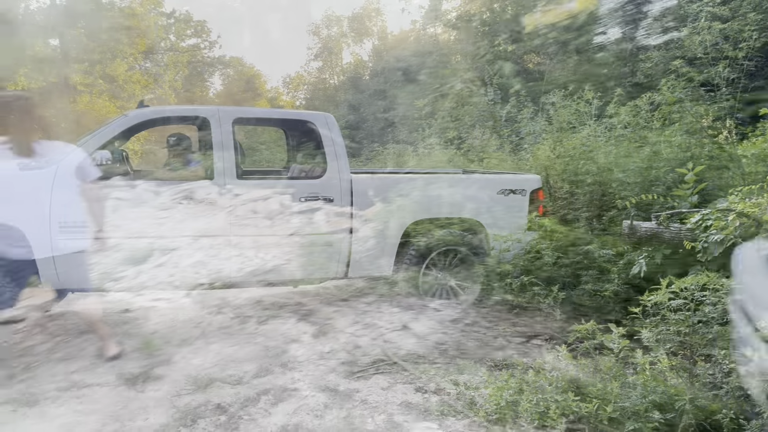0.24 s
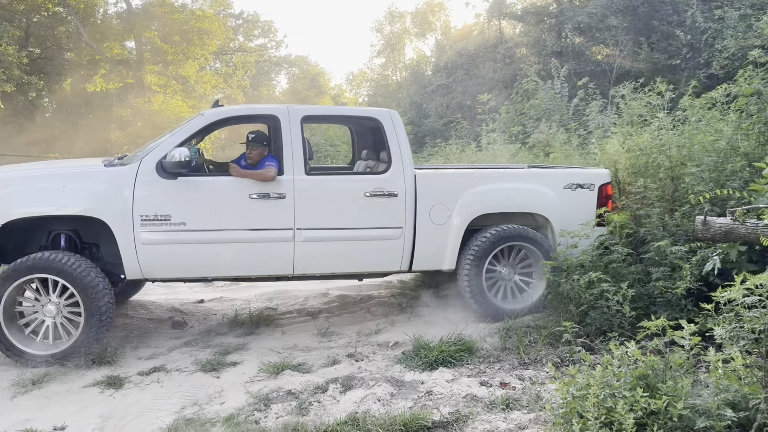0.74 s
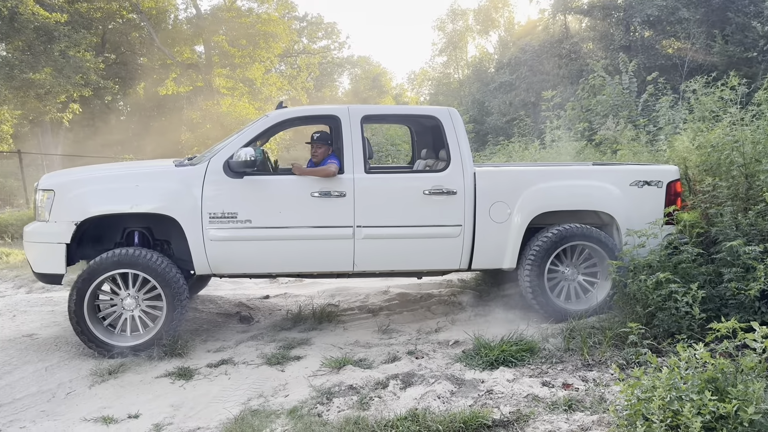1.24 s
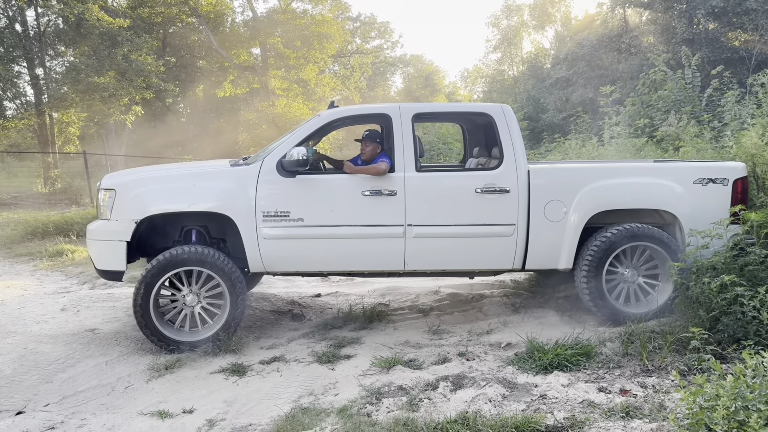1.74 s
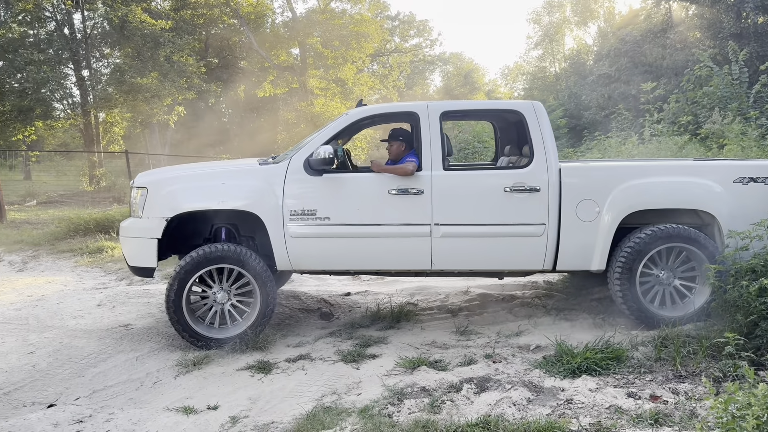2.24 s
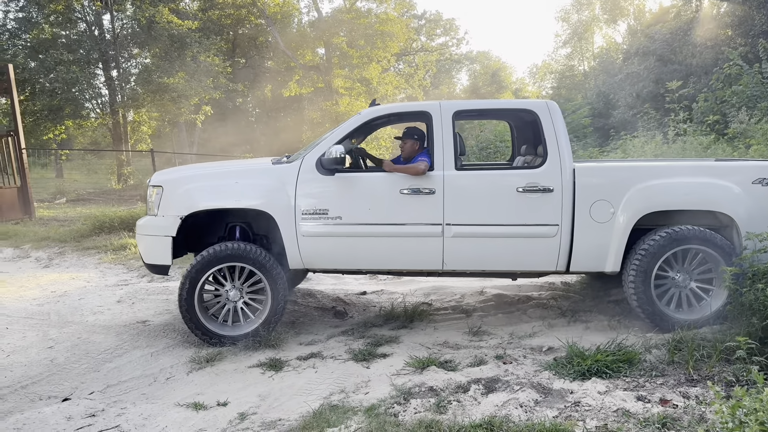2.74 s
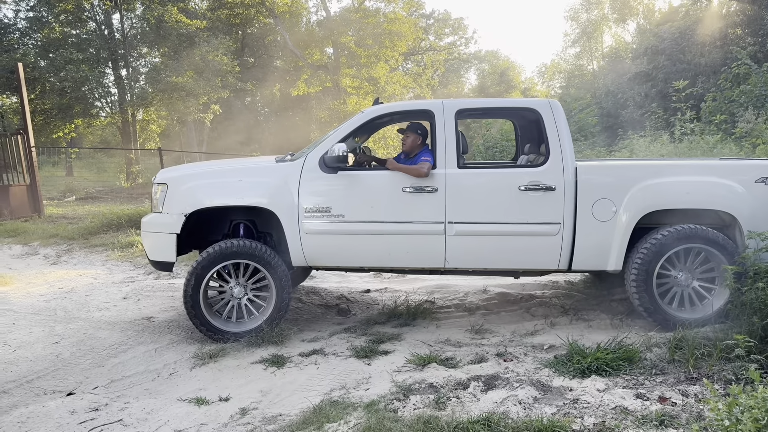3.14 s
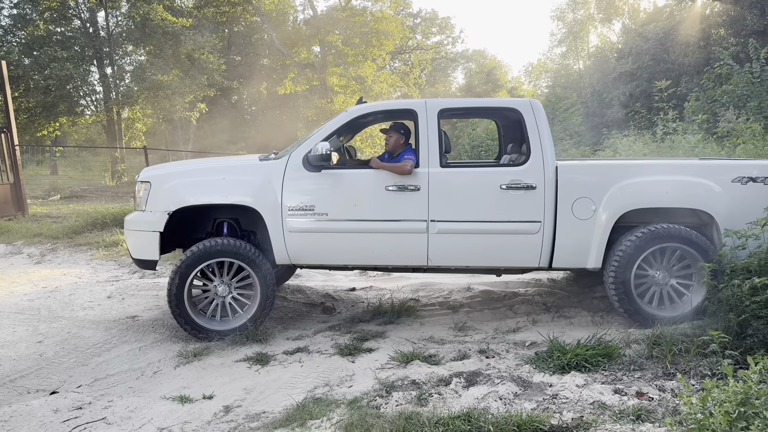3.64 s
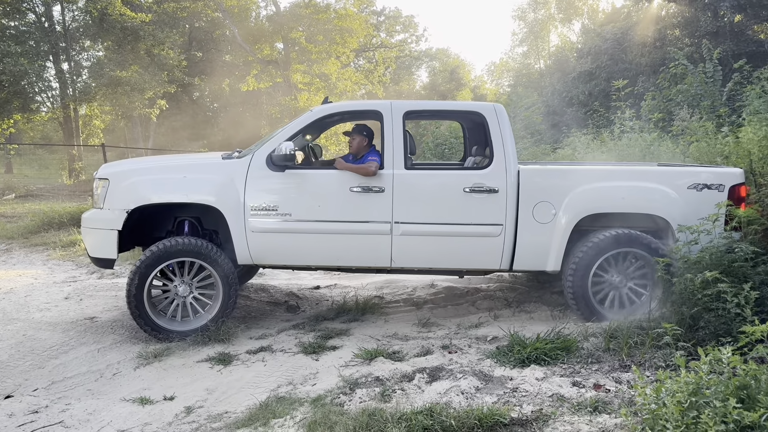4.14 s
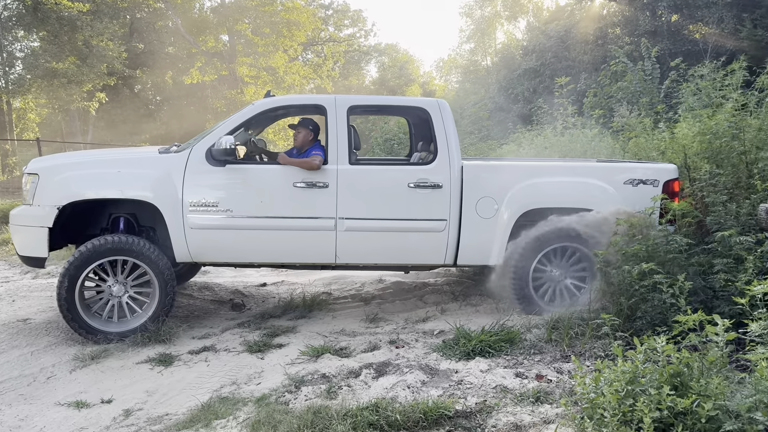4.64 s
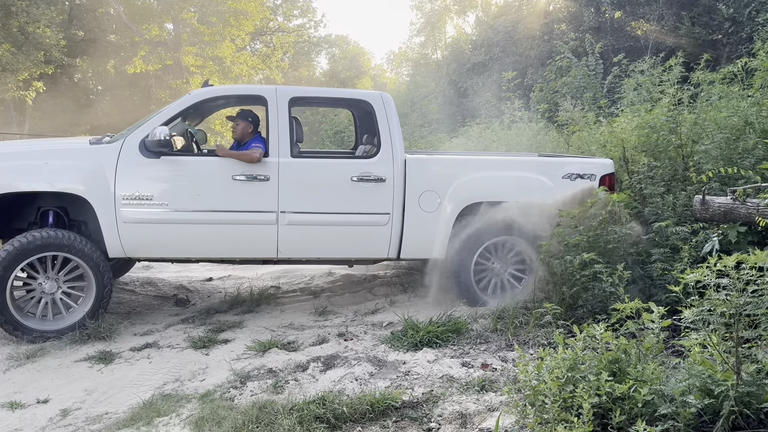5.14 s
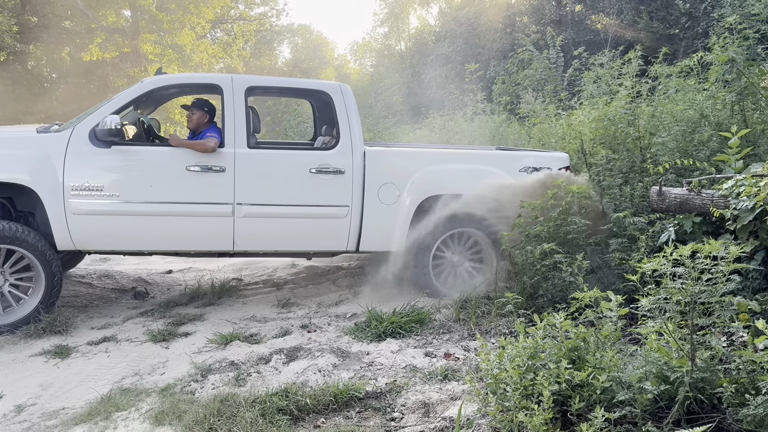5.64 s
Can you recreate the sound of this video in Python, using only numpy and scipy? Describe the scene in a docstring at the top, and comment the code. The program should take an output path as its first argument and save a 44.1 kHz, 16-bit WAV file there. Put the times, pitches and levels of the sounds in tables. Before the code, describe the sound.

Outdoors beside bushes, quiet uneven idle throbs under a cricket trill and katydid buzz, with a small knock and faint ticks. After a gentle swell and dip, the engine suddenly pulls hard: intake whoosh, deep boom merging into rising tones, rough gas rasp and crackles. The loud roar holds and cuts off. Small stereo device close by, with a slight hollow colour from the sand.

```python
"""On sand beside bushes, a V8 pickup a few metres off lopes at idle, swells a little, then pulls hard.
A wheel spins and the intake howls, a narrow band of noise. Uneven firing impulses ring the exhaust and merge
into tones at high revs; gas rasps from the tailpipe as gated noise and bounces off the ground.
Insects trill in the bushes as pulsed tones and noise; something on the truck clinks now and then.
Two microphone ports hear it all with different phase."""
import sys
import numpy as np
from scipy import signal
from scipy.fft import rfft, irfft, next_fast_len
from scipy.io import wavfile
from scipy.ndimage import uniform_filter1d, map_coordinates

SR = 44100
rng = np.random.default_rng(int(sys.argv[2]) if len(sys.argv) > 2 else 0)


def wav_record(signal):
    """Record a signal, one row per channel, as 16-bit PCM in the file named by sys.argv[1]."""
    frames = np.transpose(np.atleast_2d(signal))
    bounded = np.clip(frames, -1, 1)
    # unit amplitude maps onto the largest positive 16-bit level
    quanta = np.round(bounded * 32767).astype(np.int16)
    wavfile.write(sys.argv[1], SR, quanta)


N = 259308  # samples


def amp(db):
    """Decibels to amplitude."""
    return 10 ** (np.asarray(db) / 20)


def unit(x):
    """Scale to rms 1."""
    return x / np.sqrt(np.mean(x ** 2) + 1e-20)


def along(points, hz):
    """Interpolate (Hz, value) points on a log frequency axis."""
    f, v = np.transpose(points)
    return np.interp(np.log(hz + 1), np.log(f + 1), v)


def curves(rows):
    """One value per sample for each column after the time."""
    s, *cols = np.transpose(rows)
    return [np.interp(np.arange(N) / SR, s, c) for c in cols]


def wobble(rate):
    """A smooth random curve with rate knots a second."""
    knots = rng.standard_normal(int(N * rate / SR) + 4)
    return map_coordinates(knots, [np.arange(N) * rate / SR])


def filtered(x, response):
    """Multiply the spectrum of x by a complex response of frequency."""
    m = next_fast_len(N + SR)
    return irfft(rfft(x, m) * response(np.fft.rfftfreq(m, 1 / SR)), m)[..., :N]


def causal(points):
    """Minimum-phase response with the gain of (Hz, dB) points, by folding the cepstrum."""
    def response(hz):
        cepstrum = irfft(np.log(amp(along(points, hz)) + 1e-6))
        half = len(cepstrum) // 2
        cepstrum[1:half] *= 2
        cepstrum[half + 1:] = 0
        return np.exp(rfft(cepstrum))
    return response


def mode(hz_centre, hz_width):
    """One resonance with peak gain 1."""
    return lambda f: 1j * f * hz_width / (hz_centre ** 2 - f * f + 1j * f * hz_width)


def rush(spectrum, alike, gate=1):
    """Stereo noise of rms 1, partly shared between left and right, gated before it is coloured."""
    def colour(hz):
        turn = np.arccos(np.clip(along(alike, hz), -1, 1)) / 2
        return amp(along(spectrum, hz)) * [np.cos(turn), np.sin(turn)]
    mid, side = filtered(gate * rng.standard_normal((2, N)), colour)
    return unit(np.array([mid + side, mid - side]))


def steady(x, span_s):
    """Divide x by its own running rms."""
    power = uniform_filter1d(x ** 2, int(span_s * SR), mode="reflect")
    return x / np.sqrt(abs(power) + 1e-20)


def add(out, s, sound):
    """Mix a short sound in at a time in seconds."""
    out[:, round(s * SR):][:, :sound.shape[-1]] += sound


# Colour of leaves and far insects: freq_hz [Hz], relative level_db [dB per Hz]
AIR_COLOUR = [(1000, 9), (2500, 2), (6840, -8), (8040, -6), (9380, -9), (10800, -9), (12600, -13.5),
              (13800, -36), (15700, -15)]
# High hiss, which swells with the pull: start_s [s], level_db [dB]
AIR_LEVEL = [(0, -54), (.4, -57), (2.4, -52.5), (3.0, -55.5), (3.28, -52.5), (3.48, -39), (4.3, -49.5),
             (5.0, -50), (5.88, -45)]


def bush_air():
    """Leaves and far insects make a wide hiss: coloured noise whose level wavers."""
    level = amp(curves(AIR_LEVEL)[0] + 1.96 * wobble(11.0))
    return level * rush(AIR_COLOUR, [(3000, 0.093), (12000, 0.78)])


# Cricket trill: start_s [s], level_db [dB]
CRICKET = [(0, -75), (.5, -70), (1.3, -66), (2.7, -58), (3.4, -60), (3.7, -72), (5.88, -76)]
# Katydid buzz: start_s [s], level_db [dB]
KATYDID = [(.95, -65), (1.15, -69), (2.5, -58.5), (2.92, -60.5), (2.96, -96), (3.2, -76), (3.45, -58.5),
           (4.3, -72), (5.88, -73)]
TICK_START_S, TICK_GAP_S, TICK_COUNT = .247, .0795, 10  # katydid's slow strokes
TICK_DB, TICK_SWELL_DB = -62, 0.7  # first stroke, gain a stroke


def insects():
    """A cricket trills 69 tone pulses a second; a katydid's wing noise buzzes at 34, with slow ticks early on."""
    t = np.arange(N) / SR
    pulse = np.maximum(np.cos(2 * np.pi * 69.03 * t + 1.3), 0) ** 1.5 + .2
    tone = np.sin(2 * np.pi * 10800 * t + 1.5 * wobble(300))
    tone = tone + .4 * np.sin(2 * np.pi * 10600 * t + 1.5 * wobble(300))
    trill = unit(filtered(pulse * tone, lambda f: mode(10750, 900)(f) ** 2))
    cricket = amp(curves(CRICKET)[0]) * trill

    wing_colour = [(12500, -38.0), (13100, 5.5), (14300, 11), (15100, 9.0), (15400, -22.0)]
    wing = rush(wing_colour, [(14000, 0.65)])
    buzz = unit(1.2 + (1 + np.cos(2 * np.pi * 34.3 * t + .4 * wobble(1.8))) ** 2 / 3)
    strokes = 0
    for k in range(TICK_COUNT):
        after = t - (TICK_START_S + k * TICK_GAP_S)
        level_db = TICK_DB + k * TICK_SWELL_DB
        strokes = strokes + amp(level_db - 60 * np.maximum(after, 0) / 0.033) * (after > 0)
    katydid = wing * (amp(curves(KATYDID)[0]) * buzz + strokes)
    return cricket * amp([[.3], [-.3]]) + katydid


# Knocks on the truck: start_s [s], level_db before the mode and clack gains [dB], t60_s [s]
CLINKS = [(0.478, -73, 0.036), (0.5076, -59, 0.037), (0.5182, -54.5, 0.15)]
# Ring of a knock: pitch_hz [Hz], relative level_db [dB]
CLINK_MODES = [(1385, 13), (2100, 4), (3180, -2)]
CLINK_PAN_DB, CLACK_DB = 4.5, 10  # left over right; gain of the dry clack
# Faint bright ticks: start_s [s], level_db before the filter [dB], pan_db left over right [dB]
TAPS = [(0.6774, -48, 8), (1.5209, -45, 6), (1.6496, -47.5, -5), (2.4584, -50, 0.5), (2.6544, -49, -2)]
TAP_HZ, TAP_WIDTH_HZ, TAP_T60_S = 5000, 2300, 0.037


def clinks():
    """Small knocks, three short modes with a dry noise clack, and faint bright ticks of decaying noise."""
    knocks, taps = np.zeros((2, N + SR)), np.zeros((2, N + SR))
    t = np.arange(SR // 5) / SR
    for s, db, t60 in CLINKS:
        ring = sum(amp(level_db) * np.sin(2 * np.pi * hz * t) for hz, level_db in CLINK_MODES)
        clack = amp(CLACK_DB) * signal.lfilter([.5], [1, -.5], rng.standard_normal(len(t)))
        pan = amp([[CLINK_PAN_DB / 2], [-CLINK_PAN_DB / 2]])
        add(knocks, s, amp(db - 60 * t / t60) * (ring + clack) * pan)
    for s, db, pan_db in TAPS:
        tap = amp(db - 60 * t / TAP_T60_S) * rng.standard_normal(len(t))
        add(taps, s, tap * amp([[pan_db / 2], [-pan_db / 2]]))
    return knocks[:, :N] + filtered(taps[:, :N], mode(TAP_HZ, TAP_WIDTH_HZ))


# Tailpipe cracks: start_s [s], body level_db and treble edge level_db, both before filtering [dB]
CRACKS = [(3.441, -22, -51.5), (3.745, -31, -59.5), (3.83, -14, -62), (3.902, -22, -70),
          (4.126, -22, -67.5), (5.621, -42, -63), (5.678, -18.5, -65), (5.734, -11.5, -51),
          (5.79, -16.5, -56.5), (5.844, -20, -51)]
CRACK_T60_S, POP_HZ, POP_WIDTH_HZ = .016, 1780, 2200


def cracks():
    """Sharp pops of gas at the tailpipe, a few milliseconds of noise: a dull body and a bright edge."""
    body, edge = np.zeros((2, N + SR)), np.zeros((2, N + SR))
    t = np.arange(SR // 20) / SR
    for s, db, treble_db in CRACKS:
        burst = rng.standard_normal(len(t)) * amp(-60 * t / CRACK_T60_S)
        add(body, s, amp(db) * burst)
        add(edge, s, amp(treble_db) * burst)
    dull = filtered(body[:, :N], lambda f: mode(POP_HZ, POP_WIDTH_HZ)(f) ** 2)
    bright = filtered(edge[:, :N], lambda f: mode(8000, 9000)(f) ** 2)
    return dull + bright


HOWL_HZ, HOWL_WIDTH_HZ = 2450, 170
HOWL_DB, HOWL_S = -41, 3.463  # level before wavering and shaping; moment of its peak shape
HOWL_RISE_S, HOWL_FADE_S = .045, .3  # exponential time constants


def howl():
    """The intake howls as the throttle opens: a narrow rush of air that swells fast and fades slowly."""
    after = np.arange(N) / SR - HOWL_S
    rise = np.exp(np.minimum(after, 0) / HOWL_RISE_S)
    fade = np.exp(-np.maximum(after, 0) / HOWL_FADE_S)
    shape = np.where(after < 0, rise, fade)
    air = filtered(rng.standard_normal(N), lambda f: mode(HOWL_HZ, HOWL_WIDTH_HZ)(f) ** 2)
    return amp(HOWL_DB + 4.8 * wobble(12)) * shape * unit(air)


# Engine speed: start_s [s], cycle_hz [engine cycles a second]
SPEED = [(0, 5.5), (.3, 5.28), (.72, 5.34), (1.15, 4.76), (1.6, 5.02), (1.9, 5.88), (2.35, 6.48),
         (2.65, 6.33), (3.18, 5.28), (3.33, 5.85), (3.5, 8.29), (3.8, 13.64), (3.92, 14.16), (4.25, 14.75),
         (4.6, 15.27), (4.8, 15.29), (5.05, 15.62), (5.28, 15.94), (5.5, 16.89), (5.73, 17.81),
         (5.88, 18.03)]
CRANK_START = .962  # cycles


def cycles():
    """Engine cycles turned so far, the running sum of speed."""
    return np.cumsum(curves(SPEED)[0]) / SR + CRANK_START


# Driver's foot: start_s [s], throttle [0-1], firing scatter_db [dB]
THROTTLE = [(0, 0, 1.6), (3.25, 0, 1.6), (3.45, .8, 2), (3.8, 1, 1.5), (4.3, 1, .8), (5.88, 1, 1.3)]
# Cylinders in firing order; one bank is heard more at idle:
# idle_lag, load_lag [shares of the firing gap], idle_db, load_db [relative dB]
CYLINDERS = [(.72, -.02, -9, -.5), (.75, -.07, -7, -16), (.04, -.05, 7, -1.5), (.06, .21, 1, -8),
             (.11, .04, 6, -6.5), (.08, -.6, 4, -9), (.43, .02, -3, 0), (.03, .21, 7, -11.5)]
# Each cylinder's gas front under load: lag [share of the firing gap], sharpness_db [relative dB]
FRONTS = [(.5, -6), (.5, 2), (.35, -4), (.2, -5), (.5, -6), (.5, -5), (.1, 1), (0, -4)]
EVEN_PULL = .6  # share of the cylinders' loaded unevenness in dB kept in the boom's firings


def firings():
    """Two impulses per firing: the boom has each cylinder's strength and lag; the gas front has its own."""
    throttle, scatter_db = curves(THROTTLE)
    crank = len(CYLINDERS) * cycles()
    count = np.arange(np.ceil(crank[0]), crank[-1]).astype(int)
    at = np.searchsorted(crank, count)
    load, cylinder = throttle[at], count % len(CYLINDERS)
    idle_lag, load_lag, idle_db, load_db = np.transpose(CYLINDERS)[:, cylinder]
    front_lag, front_db = np.transpose(FRONTS)[:, cylinder]
    chance_db = scatter_db[at] * rng.standard_normal(len(at))
    wander = .025 * (1 - load) * rng.standard_normal(len(at))  # idle timing wanders

    def train(loaded_lag, loaded_db):
        lag = idle_lag + load * (loaded_lag - idle_lag) + wander
        late = np.searchsorted(crank, count + lag)
        strength = amp(idle_db + load * (loaded_db - idle_db) + chance_db)
        return np.bincount(np.clip(late, 0, N - 1), strength, N)

    return train(load_lag, EVEN_PULL * load_db), train(front_lag, front_db)


# The hot pipe at high revs: freq_hz [Hz], relative level_db [dB]
HOT_PIPE = [(30, -70), (45, -60), (60, 0), (75, -6), (95, -28), (120, -13), (150, -9), (175, -6), (200, -8),
            (230, 4), (265, -4), (290, -6), (305, 0), (320, -18), (335, -28), (355, -24), (375, -23),
            (400, -26), (440, -34), (500, -37), (600, -33)]
# The pipe's resonances rise as the gas heats: start_s [s], pitch ratio
WARMING = [(3.5, .95), (5.6, 1.036)]
# Strength of each multiple of the engine cycle, from the 4th up: relative level_db [dB]
ORDER_DB = [-20, -1, -6, -1, 12, -9, 5, -6, -6, 0, -7, -3, -5, 0, -4, -2, -7, 3, 1, 1, 5, 2, 1, 7, 7, 10, 5,
            11, 6]


def tones():
    """At high revs cycles are nearly alike: multiples lined up as the cylinders fire, through the hot pipe."""
    _, lag, _, load_db = np.transpose(CYLINDERS)
    turn = 2 * np.pi * cycles()
    moments = 2 * np.pi * (np.arange(len(lag)) + lag) / len(lag)
    hz = np.fft.rfftfreq(2 ** 16, 1 / SR)
    pipe = causal(HOT_PIPE)(hz)
    pipe_gain, pipe_phase = abs(pipe), np.unwrap(np.angle(pipe))
    heard_hz = curves(SPEED)[0] / curves(WARMING)[0]  # a hotter pipe acts as if the tone were lower
    stack = 0
    for k, db in enumerate(ORDER_DB, 4):
        line_up = np.angle(np.sum(amp(load_db) * np.exp(-1j * k * moments)))
        gain = np.interp(k * heard_hz, hz, pipe_gain)
        shift = np.interp(k * heard_hz, hz, pipe_phase)
        stack = stack + amp(db + 1.2 * wobble(6)) * gain * np.cos(k * turn + line_up + shift)
    return steady(stack, span_s=.4)


# Pipe and muffler: freq_hz [Hz], relative level_db [dB]
EXHAUST = [(30, -68.5), (45, -23), (55, 7), (65, 6.5), (75, -12), (85, -25.5), (95, -4), (110, -10.5),
           (125, 3), (145, -17), (170, 1.5), (190, -6.5), (210, -7.5), (235, 5), (255, -6), (275, -1),
           (295, -14), (320, -22.5), (345, -27), (378, -17.5), (415, -38), (442, -23), (480, -43.5),
           (700, -77)]
SMEAR_S_PER_HZ, SMEAR_CENTRE_HZ = .00025, 230  # delay gained per Hz; no added delay here
REVS_FROM_HZ, REVS_OVER_HZ = 10, 3.5  # firings merge into tones: from cycles a second, over
DRONE_ORDER, DRONE_DB = 24, -7  # a multiple of the cycle that hums at idle; gain before the exhaust


def exhaust_boom(fire, throttle):
    """Firings ring the muffler, lows out first, and merge into tones; a drone and a low rumble of gas join."""
    revs = np.clip((curves(SPEED)[0] - REVS_FROM_HZ) / REVS_OVER_HZ, 0, 1)

    def muffler(f):
        smear = np.exp(-1j * np.pi * SMEAR_S_PER_HZ * (f - SMEAR_CENTRE_HZ) ** 2)
        return causal(EXHAUST)(f) * smear

    beats = steady(filtered(fire, muffler), span_s=.4)
    boom = np.sqrt(1 - revs) * beats + np.sqrt(revs) * tones()
    drone = filtered(np.sin(2 * np.pi * DRONE_ORDER * cycles()), causal(EXHAUST))
    boom = boom + (1 - throttle) * amp(DRONE_DB) * drone
    rumble = rush(EXHAUST, [(50, .997), (150, .9), (400, .7)]) * amp(-9 - 5 * throttle - 15 * revs)
    return boom * amp([[-.4], [.4]]) + rumble


IDLE_BOOM_DB, LOAD_BOOM_DB = -25, -12  # typical boom, throttle shut and open
IDLE_RASP_DB, IDLE_RASP_GROWS = -57.5, 0.78  # rasp gain at the typical idle boom; dB gained per dB of boom
LOAD_RASP_DB, LOAD_RASP_GROWS = -29.5, 0.63  # the same under load
RASP_OPENS = 0.83  # throttle at which the rasp reaches its loaded gain


def rasp_level(boom_db, throttle):
    """The rasp's gain in dB follows the boom and climbs as the throttle opens."""
    idle_db = IDLE_RASP_DB + IDLE_RASP_GROWS * (boom_db - IDLE_BOOM_DB)
    load_db = LOAD_RASP_DB + LOAD_RASP_GROWS * (boom_db - LOAD_BOOM_DB)
    return idle_db + np.clip(throttle / RASP_OPENS, 0, 1) * (load_db - idle_db)


# Gas rush, throttle shut: freq_hz [Hz], relative level_db [dB per Hz]
RASP_IDLE = [(190, -39), (320, -28), (378, -34), (411, -48), (447, -29), (500, 1.5), (570, 9.5), (634, 4.5),
             (710, 16.5), (900, -0.5), (960, -3.5), (992, 5), (1030, -3.5), (1260, -15), (1420, -2),
             (1680, -9), (1850, -16), (2100, -5), (2300, -8.5), (2530, -30), (9000, -30), (11700, -72),
             (19800, -120)]
# Gas rush, throttle open: freq_hz [Hz], relative level_db [dB per Hz]
RASP_LOAD = [(250, -53.5), (340, 4.5), (410, 0), (600, -4.5), (740, 6.5), (810, 4), (950, -1.5), (1100, -7),
             (1290, -8), (1540, -1.5), (1650, -8.5), (1800, -3.5), (2100, -13), (2420, -10), (2700, -8.5),
             (3000, -13), (4200, -27), (6500, -65.5), (9500, -63), (13000, -75.5), (15000, -106)]
# Stereo likeness of the gas: freq_hz [Hz], left-right likeness [correlation]
ALIKE = [(60, 1.0), (240, 0.71), (950, 1), (3770, 0.33), (15000, 0.7)]
BEATS_FROM_HZ, BEATS_OVER_HZ = 13, 2.2  # the rasp separates into beats: from cycles a second, over
SNAP_HZ, SNAP_WIDTH_HZ = 820, 900  # the tailpipe rings here on each gas front
RATTLE_T60_S = .03  # each gas front rattles down the pipe this long


def tailpipe_rasp(fronts, boom_db, throttle):
    """Each gas front gates turbulent noise and snaps the tailpipe; returns the rasp and its gate."""
    beats = np.clip((curves(SPEED)[0] - BEATS_FROM_HZ) / BEATS_OVER_HZ, 0, 1)
    puffs = steady(filtered(fronts, lambda f: 1 / (1 + 2j * np.pi * f * .0012) ** 2), span_s=.4)
    gate = (2.8 - 1.2 * beats + puffs) * amp(wobble(20))  # deeper puffs at high revs
    idle_gas = amp(5.5) * rush(RASP_IDLE, ALIKE, gate)
    load_gas = rush(RASP_LOAD, ALIKE, gate)
    gas = (1 - throttle) * idle_gas + throttle * load_gas

    t = np.arange(SR // 10) / SR
    rattle = rng.standard_normal(len(t)) * amp(-60 * t / RATTLE_T60_S)  # one noise shape for every front
    rattling = signal.fftconvolve(fronts, rattle)[:N]
    tailpipe = lambda f: causal(RASP_LOAD)(f) * (0.073 + mode(SNAP_HZ, SNAP_WIDTH_HZ)(f))
    snap = steady(filtered(rattling, tailpipe), span_s=0.35)
    mix = (1 - .25 * beats) * gas + (.3 * throttle + .35 * beats) * snap
    return amp(rasp_level(boom_db, throttle)) * mix, gate


# Echo path off the sand: start_s [s], extra delay_ms [ms]
GROUND = [(0, 1.7), (.6, 1.68), (1.3, 1.58), (3.4, 1.46), (4, 1.4), (4.7, 1.54), (5.88, 1.54)]


def ground_bounce(rasp):
    """The rasp reaches the sand and returns late and inverted, mids only, combing the direct sound."""
    late = np.arange(N) - curves(GROUND)[0] * SR / 1000
    bounce = np.array([map_coordinates(ear, [late]) for ear in rasp])
    mids = lambda f: .85 * f ** 4 / (f ** 4 + 1100 ** 4) / (1 + (f / 5000) ** 2)
    return rasp - filtered(bounce, mids)


# Whistling gas: start_s [s], level_db [dB]
WHISTLE = [(3.3, -106), (3.45, -45.5), (3.85, -52), (4.1, -49), (4.5, -54), (4.9, -58), (5.88, -55)]


def gas_whistle(gate):
    """Gated gas noise whistles in two narrow bands, slightly to the left."""
    bands = lambda f: mode(4700, 400)(f) ** 2 + .7 * mode(5650, 400)(f) ** 2
    whistle = amp(curves(WHISTLE)[0]) * unit(filtered(gate * rng.standard_normal(N), bands))
    return whistle * amp([[.8], [-.8]])


# Exhaust boom: start_s [s], gain level_db [dB]
BOOM = [(0, -31.5), (.4, -28.5), (.75, -24.5), (1.3, -27.5), (1.85, -22), (2.25, -17), (2.75, -19.5),
        (3.0, -24), (3.2, -25.5), (3.42, -10.5), (3.65, -7.5), (4.05, -10), (4.35, -13.5), (5.55, -14),
        (5.88, -14)]


def engine():
    """Firings ring the exhaust; each also puffs turbulent gas, heard again off the sand."""
    boom_db, throttle = curves(BOOM)[0], curves(THROTTLE)[0]
    fire, fronts = firings()
    boom = amp(boom_db) * exhaust_boom(fire, throttle)
    rasp, gate = tailpipe_rasp(fronts, boom_db, throttle)
    return boom + ground_bounce(rasp) + gas_whistle(gate)


def scene():
    """The truck in front of the insects and the hiss of the bushes."""
    return bush_air() + insects() + clinks() + cracks() + howl() + engine()


# The two microphone ports: freq_hz [Hz], phase by which left leads [radians]
PORTS = [(400, 0), (1380, -0.5), (4480, 1.0), (8270, -0.3), (10500, -5.3), (13000, -9.9), (15400, -15.8)]
TOP_HZ = 15830  # band limit


def record(dry):
    """Two ports hear the place with different phase; peaks round off near full scale; the top is cut."""
    ending = np.clip((N - np.arange(N)) / (.004 * SR), 0, 1)  # a short fade at the end
    ports = filtered(dry * ending, lambda hz: np.exp(.5j * along(PORTS, hz) * [[1], [-1]]))
    soft = ports / (1 + abs(ports / .97) ** 6) ** (1 / 6)
    return filtered(soft, lambda hz: hz < TOP_HZ)


dry = scene()
out = record(dry)
wav_record(out)
```